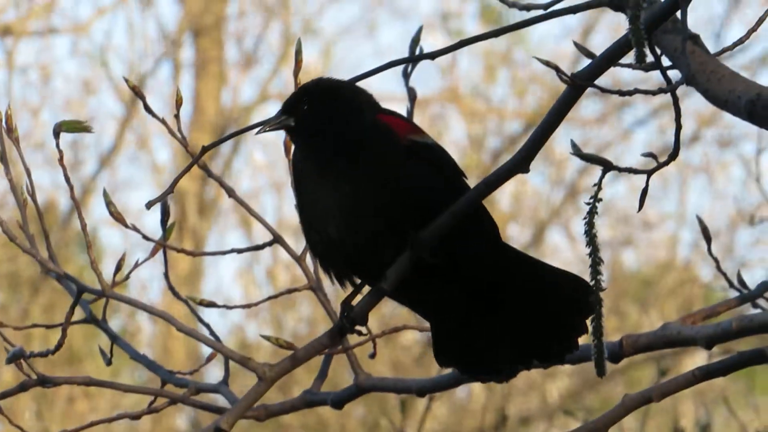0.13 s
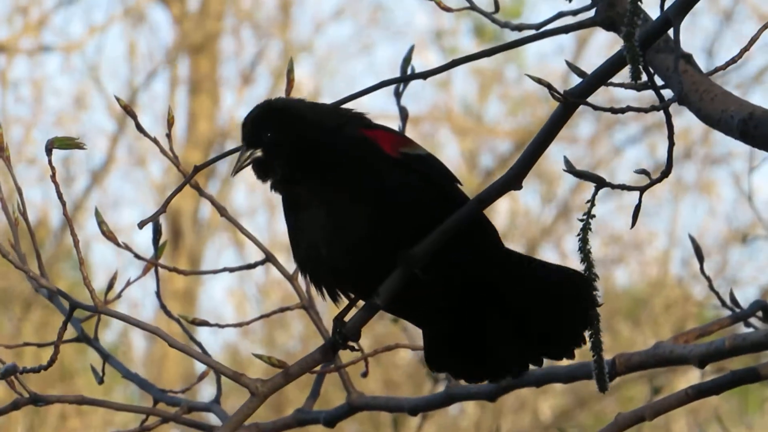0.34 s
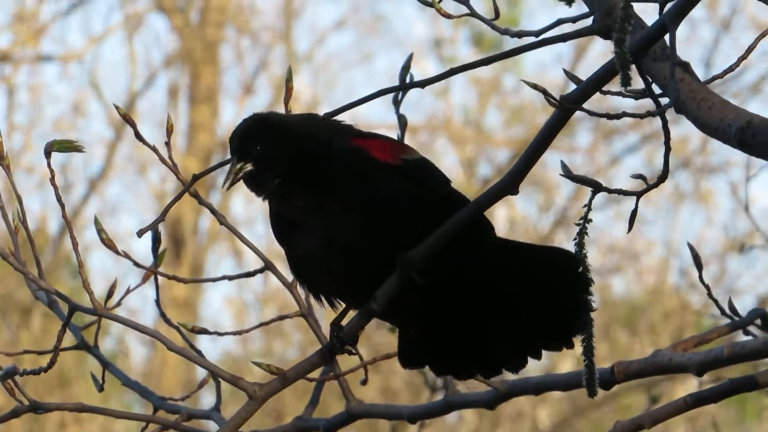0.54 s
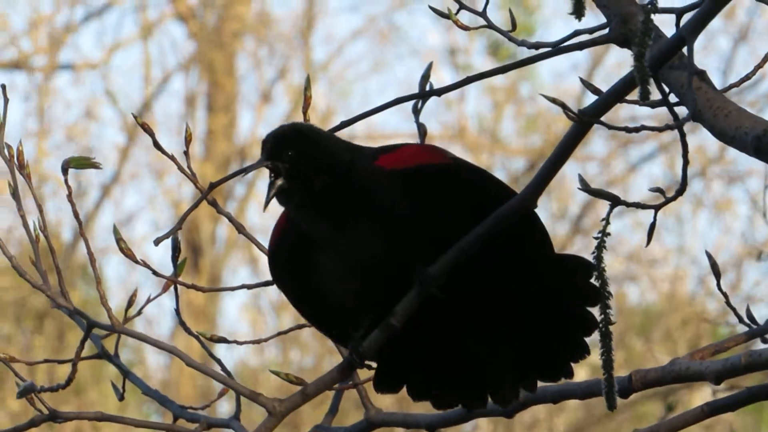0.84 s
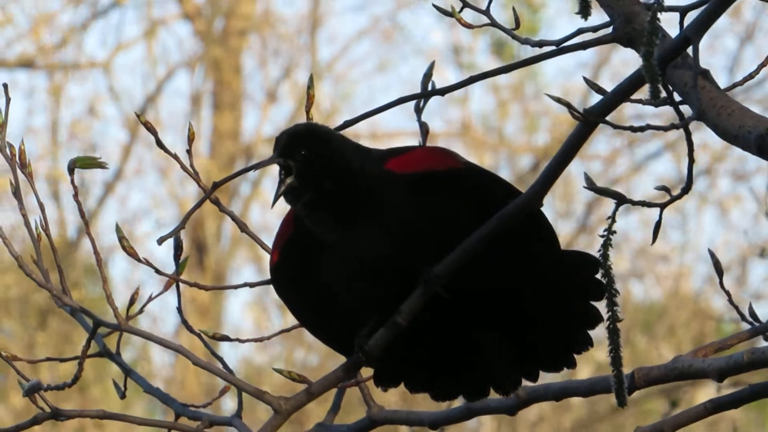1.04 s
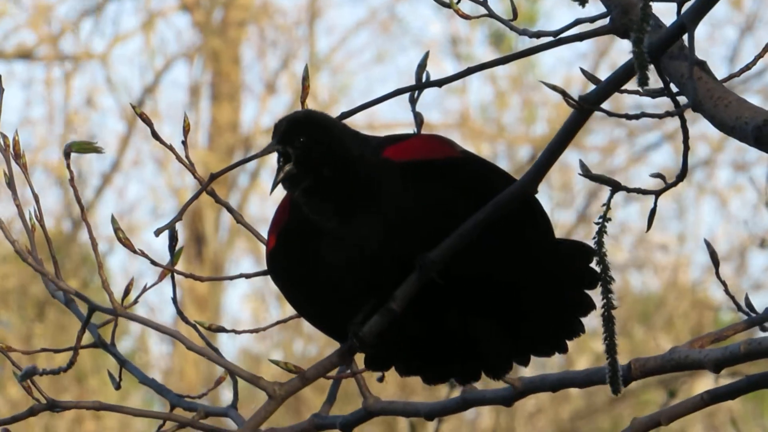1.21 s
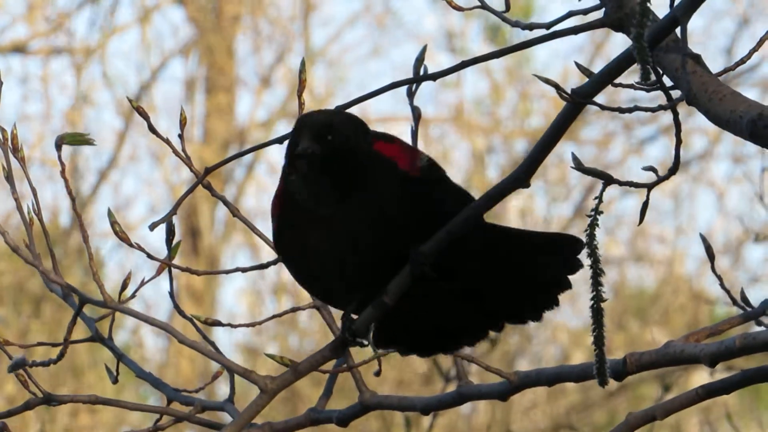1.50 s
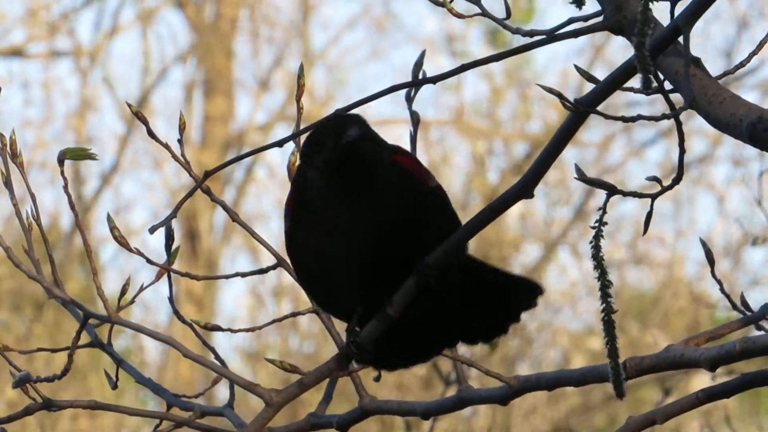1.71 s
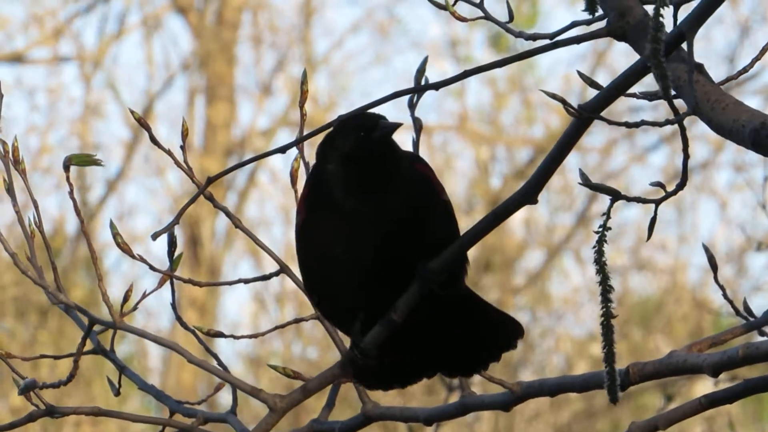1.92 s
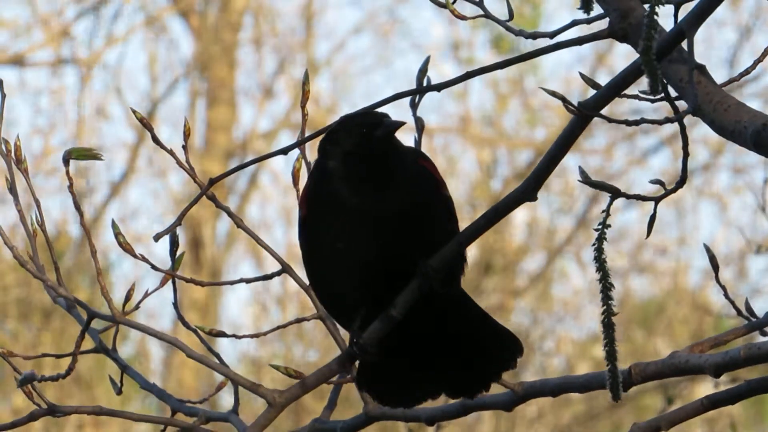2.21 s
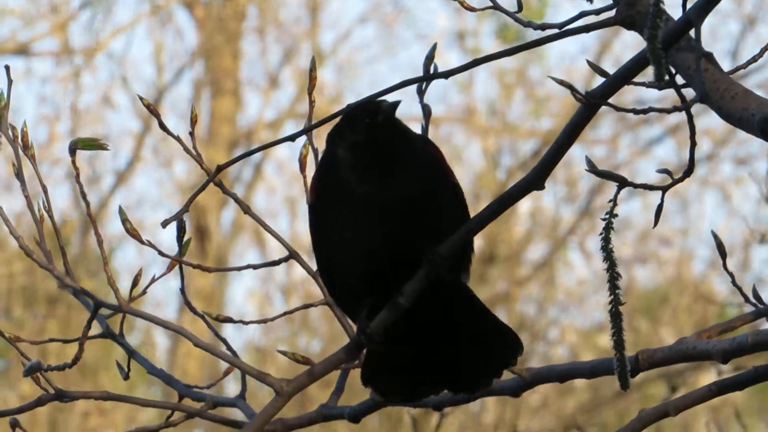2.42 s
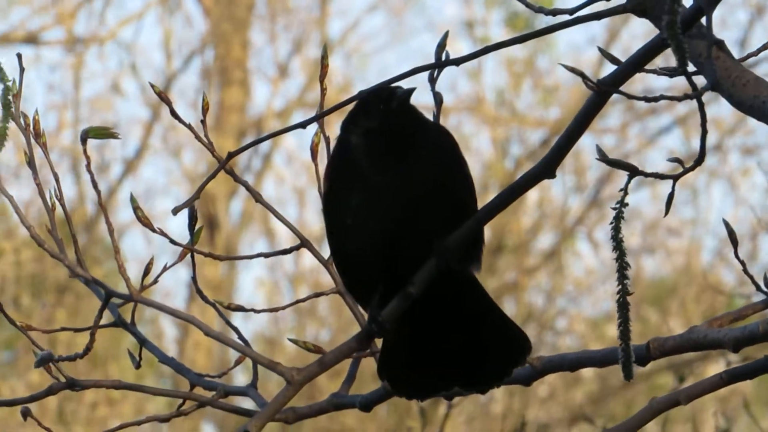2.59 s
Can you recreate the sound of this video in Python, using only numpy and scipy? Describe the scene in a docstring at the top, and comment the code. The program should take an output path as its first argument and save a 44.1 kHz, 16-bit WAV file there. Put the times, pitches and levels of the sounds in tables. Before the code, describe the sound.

Close blackbird song in open woods: brief liquid notes and a whistle lead straight into a fast rasping trill with a thin woodland tail, while low gusts buffet the microphone over dull distant traffic and slight twig ticks.

```python
"""Gusts thump a stereo microphone from the start, over far traffic, a faint hum and rustling twigs.
A blackbird on a branch then sings a few short notes, a two-voiced whistle and a buzzy trill.
Two low toots and some falling chirps are faint and distant. Wind and traffic are shaped noise, twigs are
puffs of bright noise and the calls are gliding sines; branches scatter the bird and the distant calls."""
import sys
import numpy as np
from scipy import signal
from scipy.fft import rfft, irfft
from scipy.io import wavfile
from scipy.ndimage import uniform_filter1d

SR = 44100
rng = np.random.default_rng(int(sys.argv[2]) if len(sys.argv) > 2 else 0)


def invert_db(x):
    """Field ratio 10**(x/20) for x, a level in decibels (scalar or array-like)."""
    u = np.asarray(x, float) / 20
    return 10 ** u


def bounce(signal):
    """Save signal as a 16-bit WAV file at the path given by the first command-line argument."""
    frames = np.transpose(np.atleast_2d(signal))
    limited = np.clip(frames, -1, 1)
    pcm = np.round(limited * 32767).astype(np.int16)
    wavfile.write(sys.argv[1], SR, pcm)


N = 121275
T = np.arange(N) / SR  # time_s

# Gust strength before the left/right balance: time_s, level_db
GUST_STRENGTH = [(0, -33), (.07, -22), (.22, -25), (.28, -17), (.46, -17), (.5, -29), (.58, -33),
                 (.61, -48), (.8, -46), (.87, -13), (1.0, -18), (1.33, -16), (1.44, -22), (1.48, -32),
                 (1.58, -23), (1.68, -36), (1.75, -25), (1.85, -23), (1.92, -15), (2.12, -22), (2.18, -38),
                 (2.24, -24), (2.35, -31), (2.39, -18), (2.5, -21), (2.68, -42), (2.73, -25)]
# Wind spectrum, later evened to rms 1: frequency_hz, relative_level_db (per Hz)
WIND_SPECTRUM = [(20, -44), (65, 1), (140, -2), (240, -7.5), (400, -18), (600, -36.5), (900, -55)]
# Hardest buffets, before the left/right balance: time_s, push (signed amplitude)
HARD_BUFFETS = [(0.325, 0.36), (.347, -0.66), (0.867, -0.8), (0.885, -0.71), (0.9, 0.91), (0.942, 0.83),
                (1.039, -0.81), (1.179, -0.91), (1.247, 0.806), (1.324, -0.87), (1.925, 0.59),
                (1.942, 0.37), (2.388, 0.72), (2.465, 0.31)]
# Spectrum of traffic and air, before the overall level: frequency_hz, relative_level_db (per Hz)
TRAFFIC_SPECTRUM = [(15, -36), (25, -7), (72, 2), (301, -6), (363, -5.5), (569, -11.5), (966, -14),
                    (1160, -14), (1870, -30), (3010, -35), (3930, -41), (5120, -43), (14000, -55.5)]
# Left-right likeness of the traffic: frequency_hz, correlation (0 to 1)
TRAFFIC_LIKENESS = [(60, 1), (470, 0.64), (930, 0.82), (1840, 0.76), (3650, 0.56), (7250, 0)]
# Treble of the traffic, before the overall level: time_s, relative_level_db
TRAFFIC_TREBLE = [(0, 8.5), (.3, 3.5), (.6, 2.5), (1.4, -3), (1.8, 2), (2.75, 2.5)]
# Twigs, each puff peaking just after its start: start_s, envelope_peak_db
TWIG_RUSTLES = [(0.0044, -40), (0.212, -48.5), (0.248, -48), (2.039, -50), (2.3778, -46.5), (2.3837, -54),
                (2.61, -56)]
# Two low toots far away: start_s, length_s, from_hz, to_hz, level_db
FAR_TOOTS = [(0.473, 0.045, 1160, 1120, -33), (1.449, 0.075, 1110, 1130, -38)]
# Short whistled notes that open the song: start_s, length_s, from_hz, to_hz, level_db
OPENING_NOTES = [(0.558, 0.032, 6000, 5700, -66), (0.572, 0.071, 1990, 1650, -40),
                 (0.601, 0.032, 1480, 1616, -35.5)]
# Hiss under the opening notes: time_s, level_db
BREATH_LEVEL = [(.565, -83), (.59, -58.5), (.63, -62), (.642, -48), (.66, -62), (.78, -77), (.8, -51)]
# Breath spectrum, later evened to rms 1: frequency_hz, relative_level_db
BREATH_SPECTRUM = [(3000, -23), (6500, -1), (9500, -14), (11000, 9), (13500, -10), (14500, -7)]
# Upper voice of the whistle: time_s, pitch_hz (before a slight waver), fundamental_db, overtones_db
UPPER_VOICE = [(.628, 2600, -51, -87), (.636, 2690, -36, -62), (.643, 2750, -28, -47),
               (.655, 2720, -44, -30), (.672, 2685, -47, -26), (.684, 2655, -45, -28),
               (.694, 2610, -34, -44), (.708, 2590, -22, -50), (.738, 2624, -17.5, -51),
               (.75, 2639, -20.5, -52), (.758, 2700, -27, -55), (.776, 2725, -20.5, -57),
               (.79, 2720, -32, -59), (.802, 2790, -33, -63)]
# Overtones of the upper voice: multiple (of its pitch), relative_level_db
OVERTONES = [(2, 0), (3, -24), (4, -12), (5, -25)]
# Lower voice of the whistle: time_s, pitch_hz, level_db
LOWER_VOICE = [(.688, 2244, -56), (.704, 2350, -35), (.716, 2419, -25), (.736, 2350, -24),
               (.752, 2387, -25), (.764, 2430, -31), (.784, 2390, -42), (.8, 2300, -52)]
# Sum and difference tones: upper_multiple, lower_multiple, relative_level_db
MIXED_TONES = [(2, -1, -17), (-1, 2, -23), (3, -2, -21), (1, 1, -27), (1, 2, -29), (2, 1, -33), (4, 1, -24),
               (3, 2, -30), (5, 0, -29)]
# Creaks, husky side tones of the upper voice: centre_s, length_s, spacing_hz, level_db
CREAK_BURSTS = [(.64, .005, 330, -36), (.695, .009, 330, -40)]
# Pace of the trill: time_s, syllables_sung (running count)
SYLLABLE_COUNT = [(.785, -1), (.8007, 0), (.8478, 3), (.8993, 6), (1.008, 12), (1.1737, 21), (1.3411, 30),
                  (1.4159, 34)]
# Trill effort before the throat: time_s, level_db, falling_tone_lift_hz, falling_tone_extra_db
TRILL_EFFORT = [(.793, -33, 250, 6), (.81, -26, 200, 6), (.825, -21, 30, 4), (.88, -20.5, 20, 4),
                (.96, -23.5, 15, 0), (1.3, -22, 0, 0), (1.357, -23, 0, -3), (1.37, -60, 0, -3)]
# Clear note in one syllable: share_of_syllable (wraps at 0.88), held_db, falling_hz, falling_db
CLEAR_NOTE = [(.06, -8, 3250, -16), (.16, -15, 3600, -8), (.34, -10, 3400, -14), (.45, -8, 3480, -2),
              (.54, -3, 3220, -1), (.7, 1, 3190, -6), (.9, 0, 3200, -8)]
# Reedy voice in one syllable: share_of_syllable (wraps at 0.92), pitch_hz, accent_db
REEDY_VOICE = [(0, 6200, 1), (.12, 4900, 1), (.22, 4900, -11), (.4, 4950, -11), (.52, 5050, -1),
               (.64, 5700, -13), (.86, 6050, -12)]
# Sum tones of the reedy voice: held_tone_multiple, relative_level_db, accent_depth (share)
REEDY_SUM_TONES = [(0, 0, 1), (1, -3, .5), (2, -4, .6)]
# Throat resonance on the trill: frequency_hz, gain_db
THROAT_GAIN = [(2100, -20.5), (2700, 2), (6100, -7.5), (6900, -14.5), (8000, -5.5), (9700, -9),
               (11000, -2.5), (13000, -14.5), (14000, -14)]
# Falling chirps of a distant bird: start_s, length_s, from_hz, to_hz, level_db
FAR_CHIRPS = [(2.05, .025, 4800, 4100, -63), (2.285, .03, 4500, 3200, -62), (2.395, .025, 4500, 3300, -60),
              (2.53, .03, 4600, 3200, -60)]
# Calls across the two capsules: frequency_hz, left_minus_right_db, left_lead_radians
CALL_PAN = [(1000, 1.5, 0.056), (3000, 0, 0.079), (4457, -5.5, 0.46), (8200, 9.5, 1.42), (11900, -0.5, 0.7)]
# Thin tail of the woods: frequency_hz, t60_s
WOODS_TAIL = [(2000, 0.66), (3000, 0.78), (3450, 0.93), (12000, 0.94)]
# Echoes in the woods: delay_s, level_db
WOODS_ECHOES = [(.021, -17), (.043, -16)]
# Microphone response: frequency_hz, gain_db
MIC_RESPONSE = [(20, 0), (12500, 1.5), (13800, 1), (15000, -22)]


def evened(x):
    """Scales a signal to rms 1."""
    return x / np.sqrt(np.mean(x ** 2) + 1e-20)


def read(points, hz):
    """Reads a spectrum table on a log frequency axis."""
    f, value = np.transpose(points)
    return np.interp(np.log(hz + 1), np.log(f + 1), value)


def curves(rows, at=T, **how):
    """Joins each column after the first by straight lines."""
    rows = np.transpose(rows)
    return [np.interp(at, rows[0], column, **how) for column in rows[1:]]


def angle(hz):
    """Running phase of a changing pitch."""
    return 2 * np.pi * np.cumsum(hz) / SR


def slow(size):
    """Smooth random wander of rms 1; size is the smoothing in samples."""
    return evened(uniform_filter1d(uniform_filter1d(rng.standard_normal(N), size), size))


def colour(x, db):
    """Filters by a function of frequency in dB."""
    gain = invert_db(db(np.fft.rfftfreq(x.shape[-1], 1 / SR)))
    return irfft(rfft(x) * gain, x.shape[-1])


def rasp(share, size):
    """A gain that is partly steady, partly noise, for a husky or rasping tone."""
    share = np.clip(share, 0, 1)
    return 1 - share + share * slow(size=size)


def gate(rows, fade_s=.004):
    """Open over the span of a table, with soft ends."""
    return np.clip(np.minimum(T - rows[0][0], rows[-1][0] - T) / fade_s, 0, 1)


def highpassed(hz):
    """Second-order filter that keeps what lies above a frequency."""
    return signal.butter(2, hz, "high", fs=SR, output="sos")


def glides(rows):
    """Gliding, slightly husky whistles with a quick start."""
    out = np.zeros(N)
    for start, length, from_hz, to_hz, db in rows:
        u = np.clip((T - start) / length, 0, 1)
        swell = np.sin(np.pi * np.sqrt(u))
        out += np.sqrt(2) * invert_db(db) * swell * np.sin(angle(from_hz + (to_hz - from_hz) * u))
    return out * rasp(.45, size=120)


def lumpy_noise():
    """Low wind noise in irregular lumps, rms 1."""
    lumps = rng.standard_normal(N) * invert_db(4 * slow(size=250))
    return evened(colour(lumps, lambda f: read(WIND_SPECTRUM, f) - 60 * (f > 1000)))


def wind():
    """Lumpy low noise and single buffets push the capsules opposite ways; a leak is alike in both."""
    buffet_hz, pan_db, leak_db = 154, -2.27, -17
    push, leak = lumpy_noise(), lumpy_noise()
    db = curves(GUST_STRENGTH)[0]
    level = invert_db(db)
    # above 220 Hz, weaker gusts lose one extra dB per dB below the strongest
    top = signal.sosfiltfilt(highpassed(220), push)
    push = level * (push + top * (invert_db(db - db.max()) - 1))
    for s, size in HARD_BUFFETS:
        u = (np.pi * buffet_hz * (T - s)) ** 2
        room_for_buffet = 1 - .85 * np.exp(-u / 4)  # the noise dips around each buffet
        push = push * room_for_buffet + size * (1 - 2 * u) * np.exp(-u)
    sides = np.array([[invert_db(pan_db / 2)], [-invert_db(-pan_db / 2)]])
    return push * sides + invert_db(leak_db) * level * leak


def traffic():
    """Patchy far noise whose treble fades and partly returns, with a faint hum."""
    level_db, patch_db, hum_hz, hum_db = -37, 1.74, 561, -54.5
    frames, hz = N // 256 + 5, np.fft.rfftfreq(1024, 1 / SR)
    a, b, c, d, patches = rng.standard_normal((frames, 513, 5)).T
    patches = uniform_filter1d(patches, size=12, axis=0)
    patches = evened(uniform_filter1d(patches, size=14, axis=1))
    # the right shares part of the left's noise, less of it where the likeness is low
    same = np.clip(read(TRAFFIC_LIKENESS, hz), -1, 1)[:, None]
    left = a + 1j * b
    right = same * left + np.sqrt(1 - same ** 2) * (c + 1j * d)
    treble_share = np.clip(hz / 1960.0, 0, 1)[:, None]
    treble = curves(TRAFFIC_TREBLE, np.arange(frames) * 256 / SR)[0] * treble_share
    z = np.array([left, right]) * invert_db(read(TRAFFIC_SPECTRUM, hz)[:, None] + patch_db * patches + treble)
    noise = invert_db(level_db) * evened(signal.istft(z, nperseg=1024, noverlap=768)[1][:, :N])
    hum = invert_db(hum_db + 1.0 * slow(size=3000)) * np.sin(2 * np.pi * hum_hz * T)
    return noise + hum


def rustles():
    """Twigs: short bright puffs of noise, separate in each capsule."""
    puff_s = 0.0012
    shape = sum(invert_db(db) * np.exp(-((T - s - puff_s) / puff_s) ** 2) for s, db in TWIG_RUSTLES)
    return shape * signal.sosfilt(highpassed(3500), rng.standard_normal((2, N)))


def toots():
    """Low distant toots, nearly level in pitch."""
    return glides(FAR_TOOTS)


def notes():
    """The short notes that open the song, each a gliding sine."""
    return glides(OPENING_NOTES)


def breath():
    """Thin hiss of air in the throat."""
    hiss = colour(rng.standard_normal(N), lambda f: read(BREATH_SPECTRUM, f) - 40 * (f < 2500))
    return evened(hiss) * invert_db(curves(BREATH_LEVEL, left=-120, right=-120)[0])


def creaks(p):
    """Brief combs of husky side tones around the upper voice, whose phase is p."""
    out = np.zeros(N)
    for s, length, gap, db in CREAK_BURSTS:
        burst = invert_db(db) * np.exp(-((T - s) / length) ** 2)
        for k in (-1, 1, 2):
            out += burst * np.sin(p + k * 2 * np.pi * gap * T) * rasp(.5, size=60)
    return out


def whistle():
    """Two voices beat against each other and mix into sum and difference tones."""
    hz, db, over_db = curves(UPPER_VOICE)
    low_hz, low_db = curves(LOWER_VOICE)
    p = angle(hz * (1 + 0.0041 * slow(size=150)))
    q = angle(low_hz)
    up = invert_db(db) * gate(UPPER_VOICE)
    low = invert_db(low_db) * gate(LOWER_VOICE)
    over = sum(invert_db(d) * np.sin(round(k) * p) for k, d in OVERTONES)
    over = over * invert_db(over_db) * gate(UPPER_VOICE)
    mixed = np.zeros(N)
    for m, n, d in MIXED_TONES:
        husk = .4 * (m + n > 1 or m > 2)  # the other mixed tones stay smooth
        mixed += invert_db(d) * np.sin(round(m) * p + round(n) * q) * rasp(husk, size=50)
    return up * np.sin(p) + creaks(p) + low * np.sin(q) + over + mixed * np.sqrt(up * low)


def trill():
    """One syllable repeated: two clear tones that beat, and a rasping dive that mixes with them."""
    held_hz, wobble, shimmer_db, reedy_db, reedy_rise_s = 3027, .003, 1.3, -10, .008
    share = curves(SYLLABLE_COUNT)[0] % 1
    db, lift, tilt_db = curves(TRILL_EFFORT)
    held_db, fall_hz, fall_db = curves(CLEAR_NOTE, share, period=0.88)
    reed_hz, accent_db = curves(REEDY_VOICE, share, period=0.92)
    q = angle(held_hz * (1 + wobble * (slow(size=200) + 2 * slow(size=1500))))
    r = angle(fall_hz * (1 + 2 * wobble * slow(size=300)) + lift)
    fall = np.sin(r) + invert_db(-14) * np.sin(2 * q - r)  # with its difference tone
    fall *= rasp(.25, size=40)
    held = invert_db(held_db + shimmer_db * slow(size=90)) * np.sin(q)
    clear = held + invert_db(fall_db + tilt_db + shimmer_db * slow(size=90)) * fall
    p = angle(reed_hz * (1 + 2 * wobble * slow(size=80)))
    reed = np.zeros(N)
    for k, d, depth in REEDY_SUM_TONES:
        k = round(k)
        rough = rasp(.4 + .15 * k, size=18 - 4 * k)  # higher sum tones rasp more and faster
        reed += invert_db(d + depth * accent_db) * np.sin(p + k * q) * rough
    reed = invert_db(reedy_db) * reed * gate(TRILL_EFFORT, reedy_rise_s)
    voice = invert_db(db) * gate(TRILL_EFFORT) * (clear + reed)
    return colour(voice, lambda f: read(THROAT_GAIN, f))


def chirps():
    """Falling chirps of a distant bird, each a downward glide."""
    return glides(FAR_CHIRPS)


def placed(x):
    """Level and phase difference between the two capsules."""
    hz, (f, db, lead) = np.fft.rfftfreq(N, 1 / SR), np.transpose(CALL_PAN)
    half = invert_db(np.interp(hz, f, db) / 2) * np.exp(1j * np.interp(hz, f, lead) / 2)
    return irfft(rfft(x) * np.array([half, 1 / half]), N)


def woods(x):
    """Scatter from branches, a few echoes and a long thin tail."""
    near_db, near_t60_s, tail_db = -11, .05, -16.5
    t = T[:SR]
    # sparse random clicks, about 2000 per second, stand for single reflections
    taps = rng.choice([-1., 1.], (2, 2, SR)) * (rng.random((2, 2, SR)) < 2000 / SR)
    near = taps[0] * invert_db(-60 * t / near_t60_s)
    hz, frame, z = signal.stft(taps[1], SR, nperseg=256)
    decay = invert_db(-60 * frame / read(WOODS_TAIL, hz)[:, None])
    far = signal.istft(z * decay, SR, nperseg=256)[1][:, :SR]
    room = invert_db(near_db) * (near + near[0]) / np.linalg.norm(near[0]) / 2  # partly alike in both capsules
    room = room + invert_db(tail_db) * far / np.linalg.norm(far[0])
    room[:, 0] += 1  # direct sound
    for delay, db in WOODS_ECHOES:
        room[:, round(delay * SR)] += invert_db(db)
    return signal.fftconvolve(x, room, axes=1)[:, :N]


def scene():
    """Wind, traffic and twigs at the microphone, with the calls heard through the woods."""
    calls = toots() + notes() + breath() + whistle() + trill() + chirps()
    return wind() + traffic() + rustles() + woods(placed(calls))


def roll_off(x):
    """The treble ends steeply here."""
    return signal.sosfilt(signal.butter(12, 14980, fs=SR, output="sos"), x)


def record(dry):
    """Microphone response with its treble roll-off, then a hard ceiling at full scale."""
    heard = colour(dry, lambda f: read(MIC_RESPONSE, f))
    mix = np.clip(heard, -1.0, 1.0)
    return roll_off(mix)


dry = scene()
out = record(dry)
bounce(out)
```